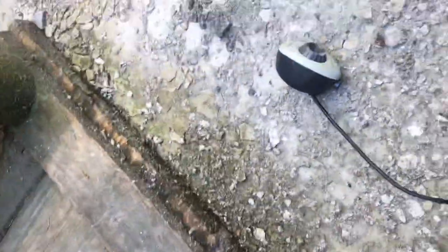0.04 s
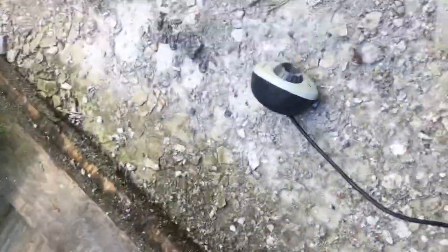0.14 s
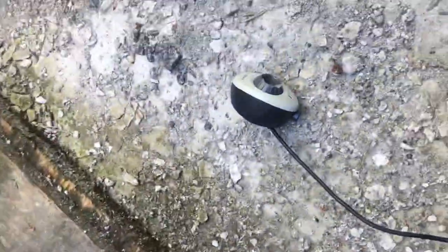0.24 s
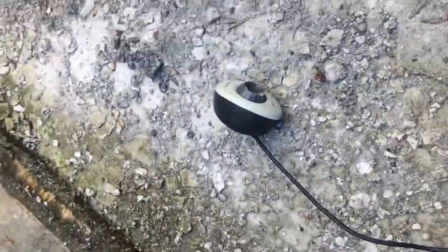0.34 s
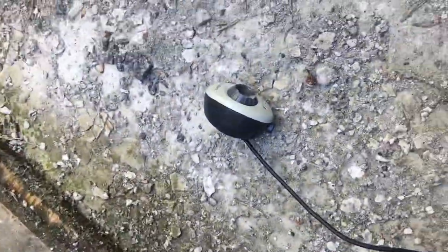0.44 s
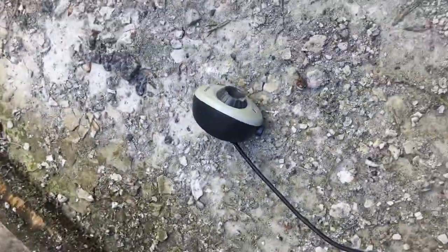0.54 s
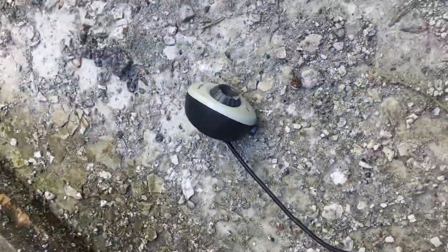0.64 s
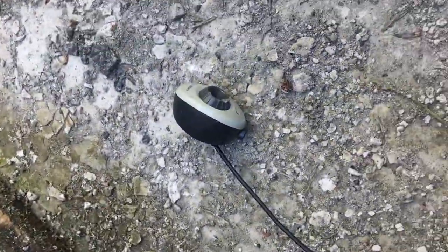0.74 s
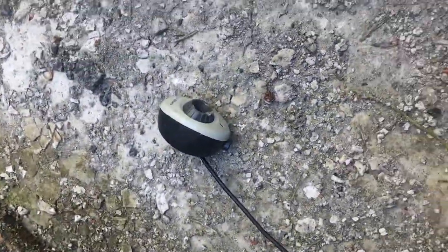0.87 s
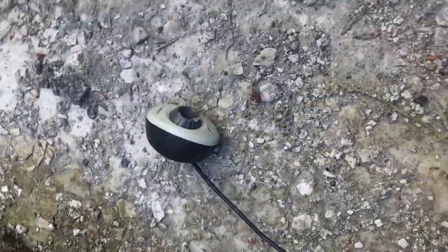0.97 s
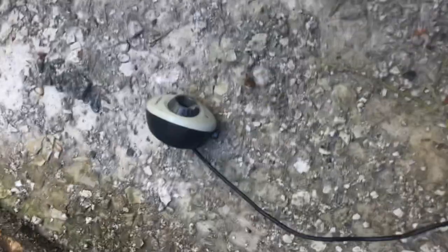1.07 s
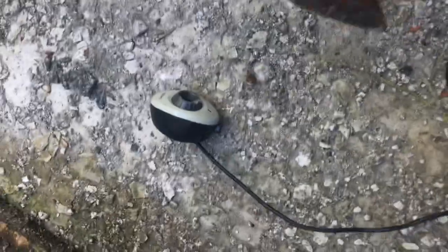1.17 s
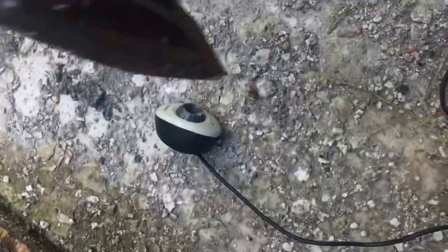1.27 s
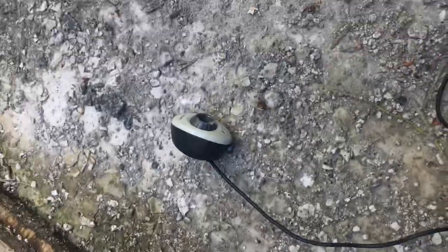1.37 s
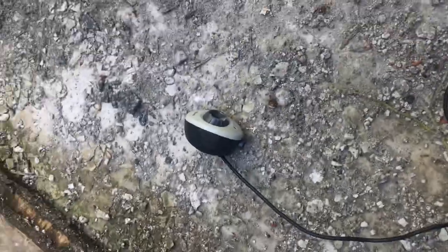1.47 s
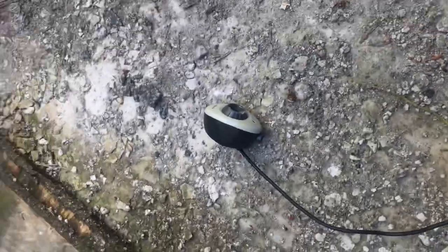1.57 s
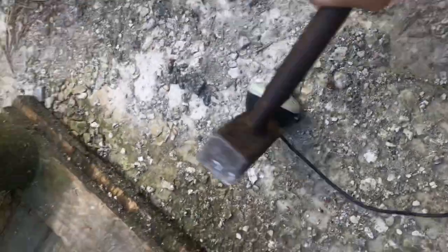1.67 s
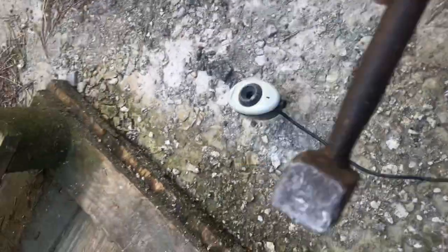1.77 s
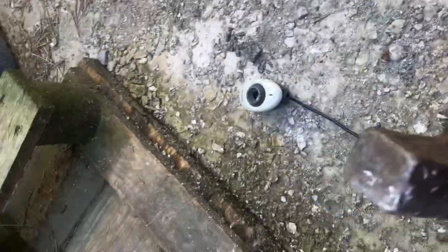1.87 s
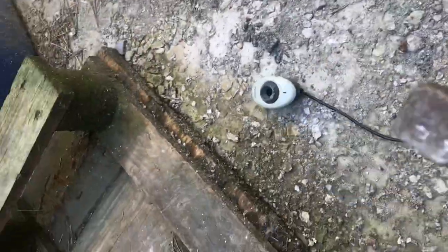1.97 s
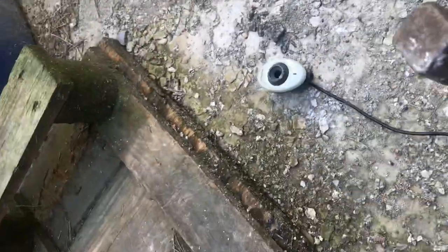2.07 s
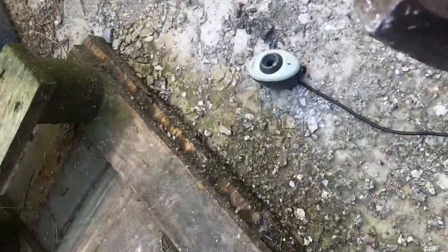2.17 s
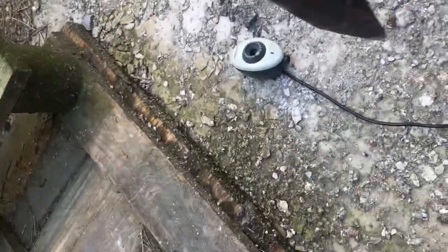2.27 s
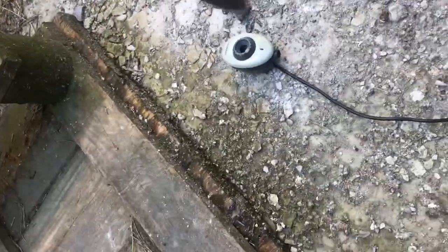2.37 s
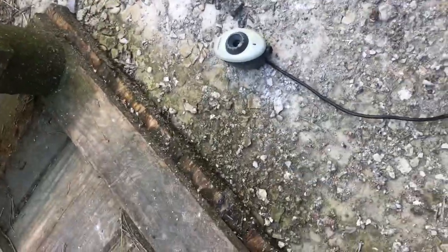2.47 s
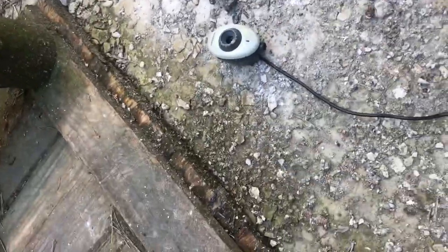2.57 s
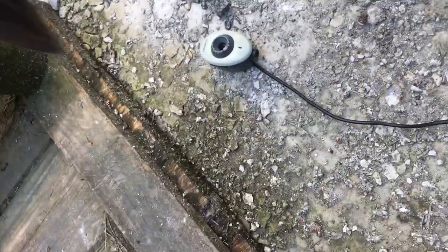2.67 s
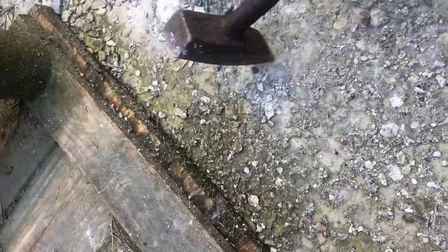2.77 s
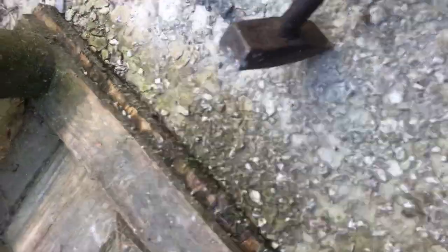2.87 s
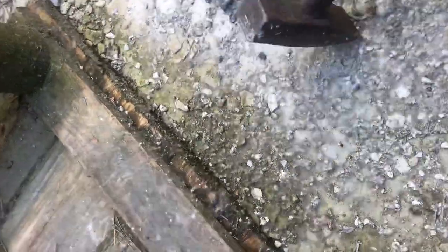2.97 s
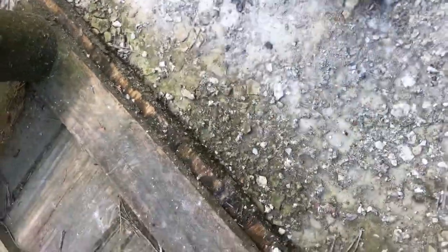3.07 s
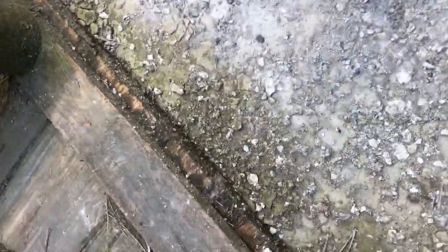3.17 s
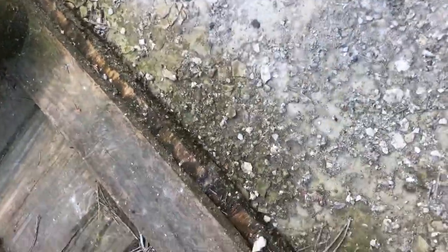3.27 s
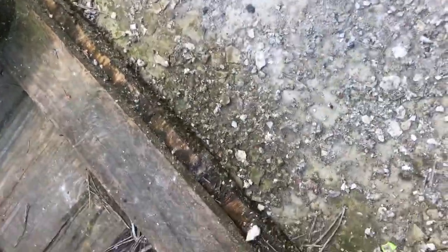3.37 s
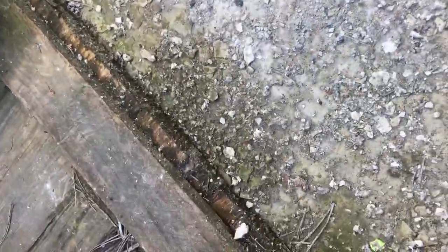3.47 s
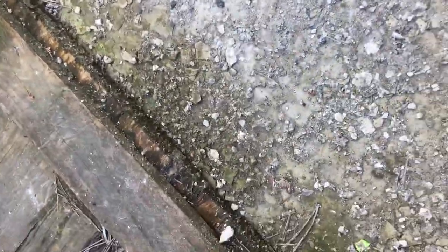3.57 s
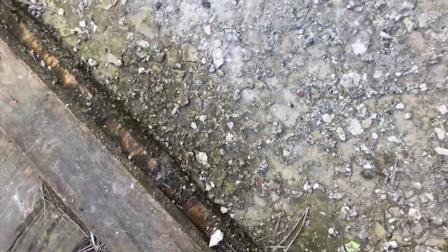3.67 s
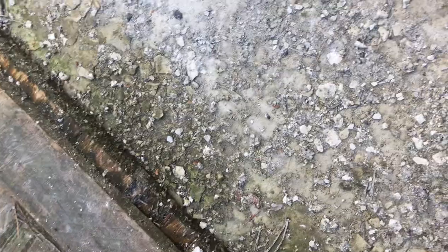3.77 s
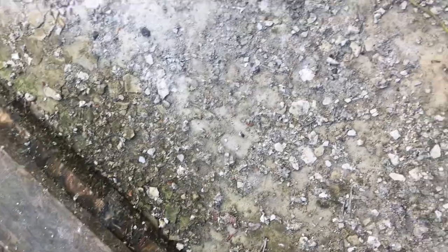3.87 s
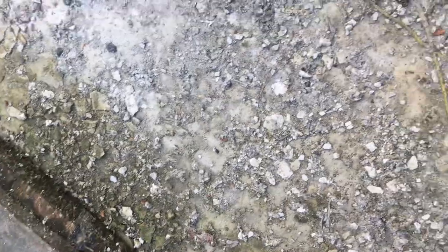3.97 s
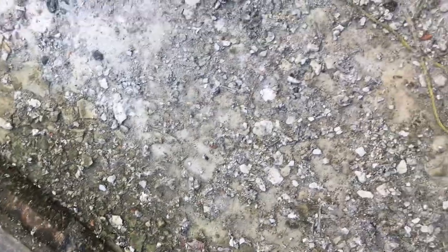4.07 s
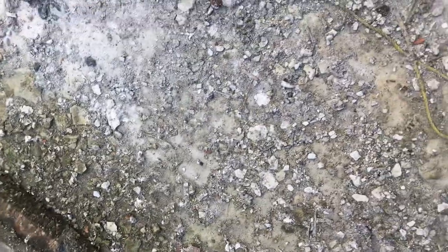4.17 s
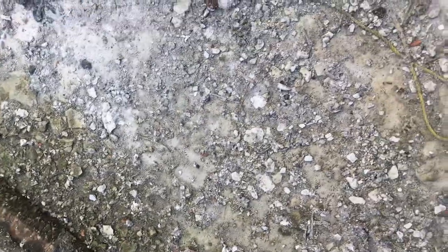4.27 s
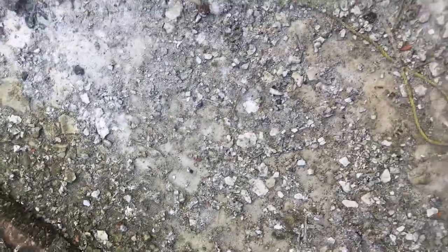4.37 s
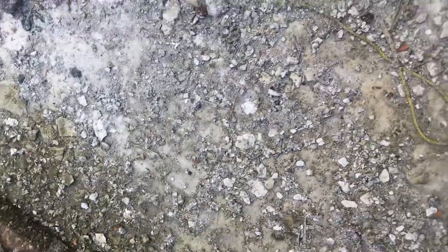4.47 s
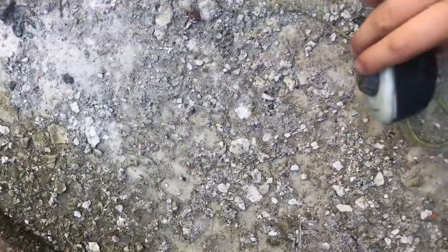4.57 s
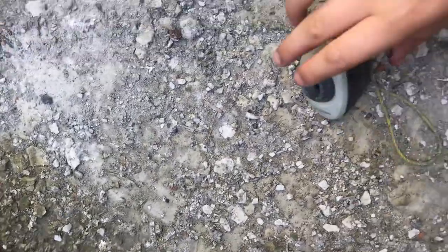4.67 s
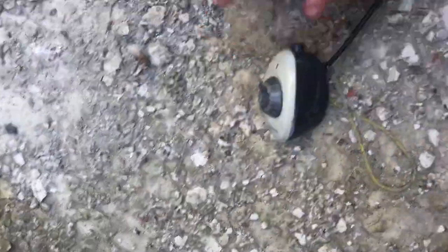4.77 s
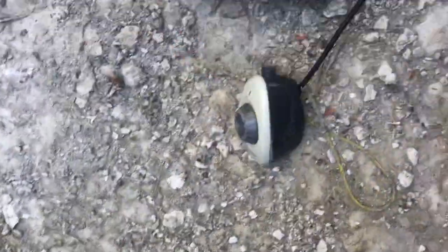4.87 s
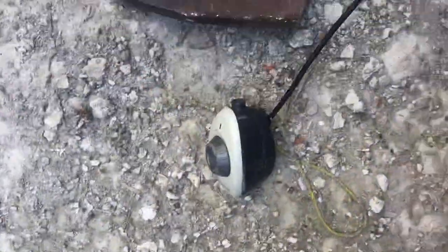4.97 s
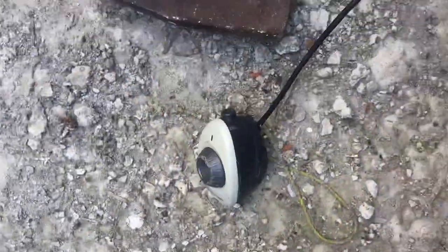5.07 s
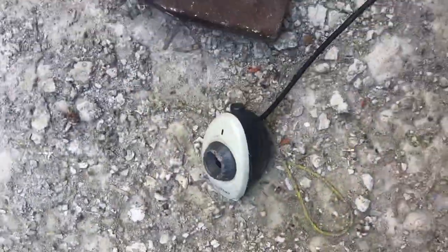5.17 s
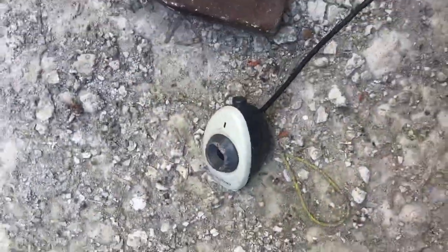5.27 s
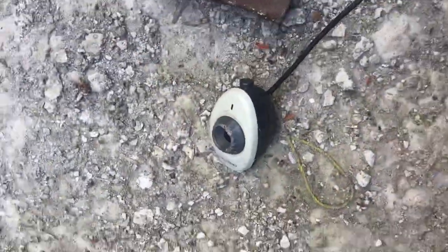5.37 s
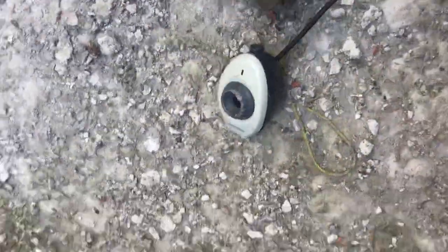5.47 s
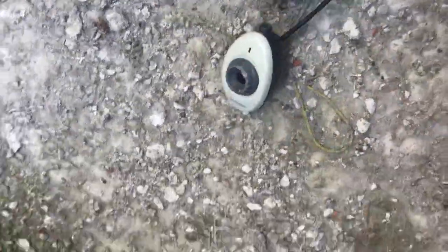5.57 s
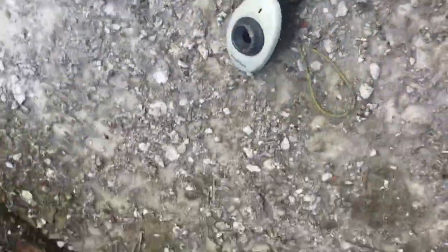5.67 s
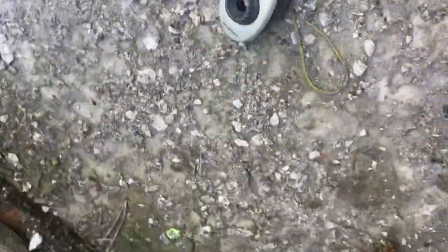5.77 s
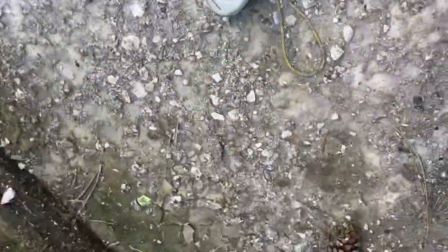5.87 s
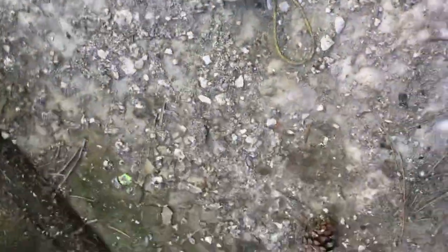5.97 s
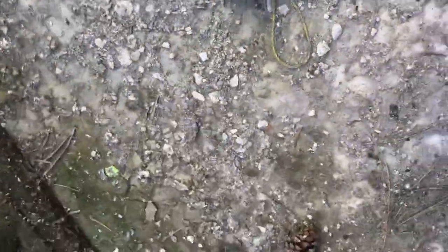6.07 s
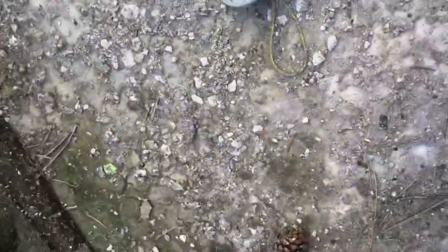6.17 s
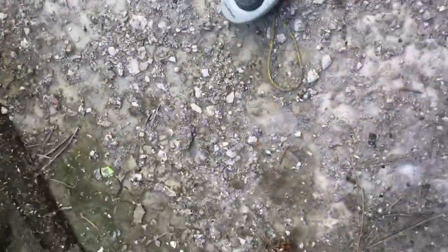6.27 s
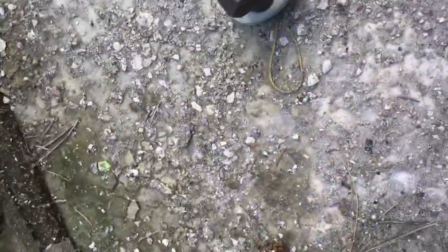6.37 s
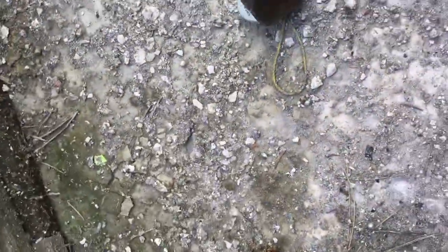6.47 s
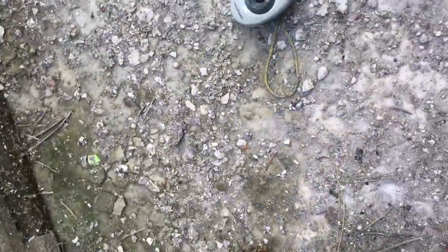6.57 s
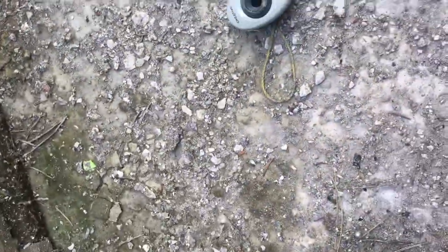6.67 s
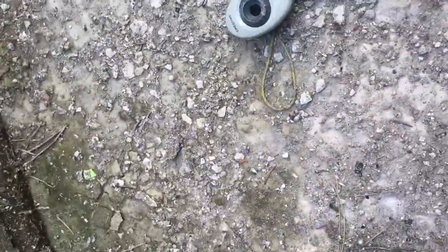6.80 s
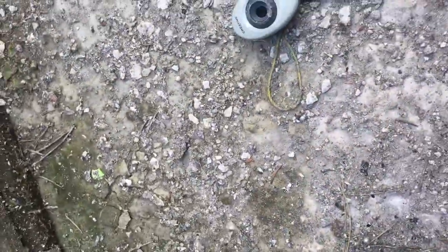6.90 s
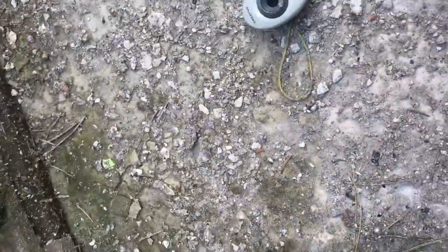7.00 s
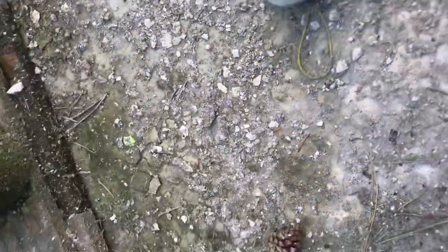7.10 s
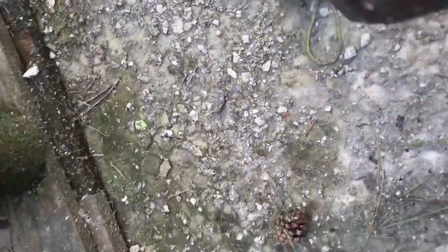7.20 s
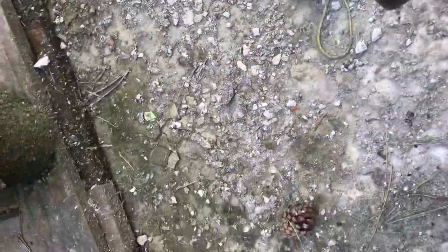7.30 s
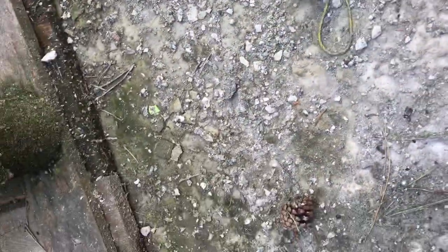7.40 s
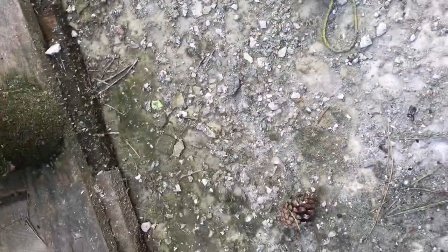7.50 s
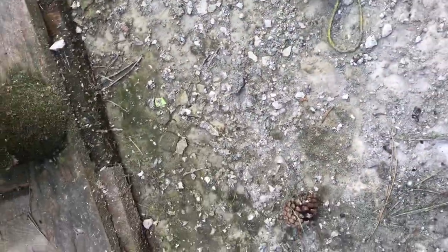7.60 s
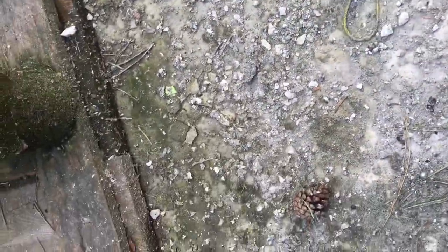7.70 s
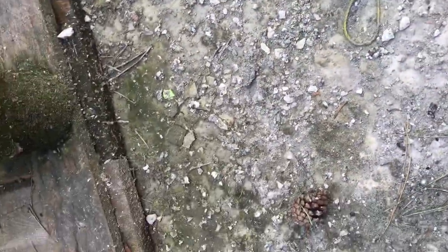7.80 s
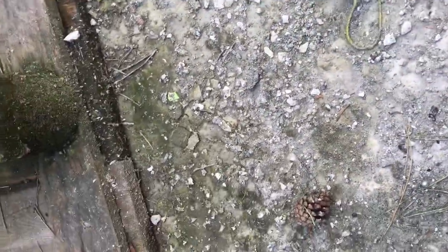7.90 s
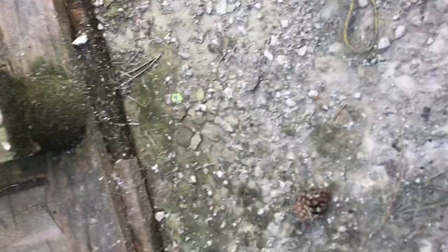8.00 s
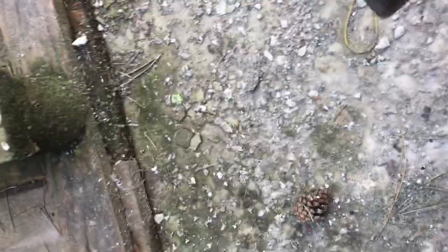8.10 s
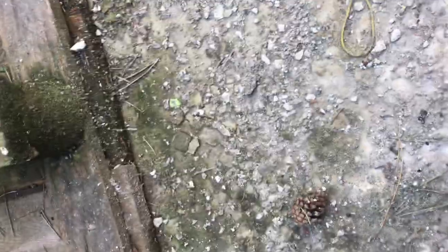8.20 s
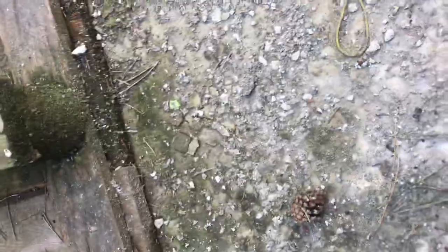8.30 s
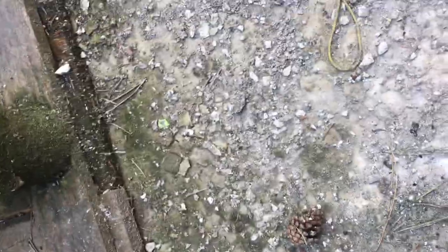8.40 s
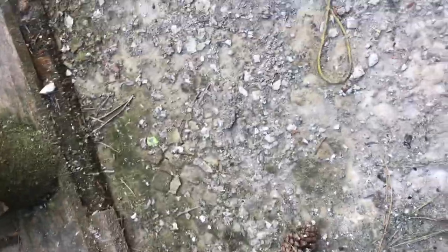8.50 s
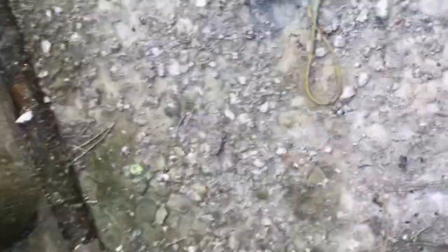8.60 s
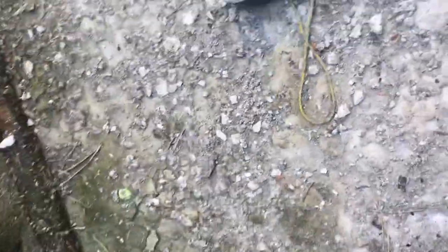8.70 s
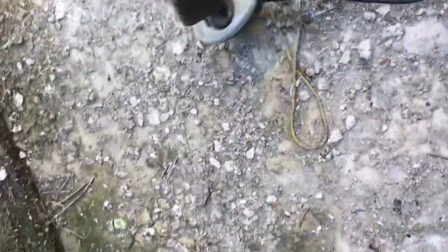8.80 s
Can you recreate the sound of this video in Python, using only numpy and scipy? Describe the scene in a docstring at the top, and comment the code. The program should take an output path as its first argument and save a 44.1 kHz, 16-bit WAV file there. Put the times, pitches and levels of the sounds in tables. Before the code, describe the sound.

A hammer cracks down six times on a small plastic camera on gravel, the casing knocking hollowly, over faint distant traffic.

```python
"""Distant traffic rumbles, grit ticks under moving feet and cable, and air puffs over the microphone.
At 1.7 s and 2.8 s a steel hammer cracks down on a small plastic camera lying on gravel. The casing
bounces and tumbles with hollow knocks, and the hammer head rings where it touches stone.
The traffic swells, and from 6.4 s four more blows land. The single microphone overloads on the blows."""
import sys
import numpy as np
from scipy import signal
from scipy.fft import rfft, irfft, next_fast_len
from scipy.io import wavfile
from scipy.ndimage import uniform_filter1d, map_coordinates

SR = 44100
rng = np.random.default_rng(int(sys.argv[2]) if len(sys.argv) > 2 else 0)


def int16_out(signal):
    """Quantize to a 16-bit WAV file."""
    q = np.round(np.clip(np.atleast_2d(signal).T, -1, 1) * 32767)
    wavfile.write(sys.argv[1], SR, q.astype(np.int16))


N = 390285

# Fader moves of the far road: (time [s], rumble [dB], tyre roar [dB])
ROAD_LEVELS = [(0.0, -43.5, -53.5), (1.18, -41.5, -55), (1.58, -38.5, -53.5), (2.44, -44, -52),
               (3.89, -38, -52), (4.04, -38, -51.5), (4.39, -40, -51), (5.1, -39, -49), (6.21, -33, -41.5),
               (7.05, -35, -44.5), (7.4, -35, -47), (8.55, -35, -47.5), (8.85, -33.5, -51.5)]
# Engine drones, one early, one rising, one fainter and falling: (time [s], pitch [Hz], level [dB])
EARLY_ENGINE = [(0, 75.9, -38.5), (.3, 79.94, -91), (.6, 84.7, -39), (1.1, 85.5, -58)]
RISING_ENGINE = [(3.9, 69.15, -55), (4.02, 71.24, -40.5), (4.88, 75.5, -44), (5.7, 81.47, -34.5),
                 (5.9, 82.17, -45), (6.41, 90, -38.5), (7.2, 89.7, -39), (8.7, 93.6, -32), (8.85, 86, -40)]
FALLING_ENGINE = [(5.4, 177.3, -54), (5.8, 181.8, -46), (6.7, 184, -46.5), (6.9, 160.9, -57.5),
                  (7.15, 148.5, -33.5), (7.35, 149.4, -51.5), (7.58, 150.4, -44.5), (8.1, 145, -47.5),
                  (8.85, 140, -46)]
# EQ curves of road rumble, tyre roar, buffeting air and grit: (frequency [Hz], level [dB])
RUMBLE_EQ = [(12, -43.5), (20, -3.5), (81, -1), (93, -3.5), (108, -8), (182, -17.5), (221, -19.5),
             (300, -21), (390, -46), (660, -120)]
ROAR_EQ = [(88, -32.5), (150, -5.5), (205, -10.5), (370, -9.5), (429, -16), (668, -10.5), (813, -18.5),
           (1040, -12.5), (1910, -19.5), (6640, -67), (7570, -68), (9840, -82), (16700, -120)]
AIR_EQ = [(12, -42.5), (20, 1), (65, -2.5), (167, -19), (316, -33), (471, -48), (600, -45), (780, -80),
          (1320, -120)]
GRIT_EQ = [(800, -32), (2000, -7.5), (3000, 9), (5000, 1), (7500, -5.5)]
# Air on the microphone: (time [s], hold [s], level [dB], rise [dB/s], fall [dB/s])
AIR_PUFFS = [(1.155, 0.049, -17.5, 202, 257), (2.25, 0.011, -42.5, 450.5, 140.5)]
# Bed of sliding grit: (time [s], level [dB])
GRIT_LEVELS = [(0.0, -59), (0.15, -69), (1.4, -68), (1.62, -69), (1.75, -70), (2.34, -63), (2.54, -69),
               (3.13, -69.5), (3.52, -60), (3.77, -64.5), (4.26, -72), (5.37, -63.5), (5.52, -59),
               (5.84, -60.5), (7.25, -70), (8.04, -59.5), (8.18, -60.5), (8.55, -69.5), (8.85, -67)]
# The clearest grit ticks: (time [s], level [dB], pitch [Hz])
GRIT_TICKS = [(0.0757, -43, 3060), (0.1007, -37.5, 3150), (0.1196, -32.5, 5600), (0.2142, -35, 4080),
              (0.231, -36, 5790), (0.2743, -45, 2470), (0.2897, -44, 2480), (0.4758, -42, 4070),
              (0.5566, -39, 3040), (0.843, -34.5, 4334), (0.9951, -44, 4880), (1.3493, -41, 3350),
              (1.3793, -55, 2420), (1.4262, -47, 3750), (1.4601, -38, 3800), (1.6212, -42, 3740),
              (1.8557, -40, 6030), (2.0857, -41, 5860), (2.1804, -44.5, 2560), (2.2308, -57, 2700),
              (2.2737, -43, 2820), (2.353, -52, 2950), (2.4645, -40, 2530), (2.5526, -37, 3780),
              (3.1294, -41, 2740), (3.7224, -39, 2890), (3.7723, -44, 6120), (4.1956, -33, 6500),
              (4.886, -36.5, 3420), (4.9107, -43.5, 2750), (5.3981, -42, 3720), (5.4735, -32, 4870),
              (5.4864, -32, 2900), (5.5817, -36, 2480), (5.6745, -37, 3040), (5.813, -31, 2920),
              (5.853, -34, 5860), (5.895, -28.5, 6360), (5.9693, -36, 2550), (6.0534, -32, 2910),
              (6.0836, -48, 3700), (6.105, -34.5, 4240), (6.1486, -28.5, 6060), (6.2148, -39, 2400),
              (8.2337, -46, 3010), (8.2877, -51, 3160)]
# Casing and cable drag over stones:
# (time [s], length [s], level [dB], hollow part [relative dB], bright part [relative dB], jerkiness [dB])
DRAGS = [(.08, 0.31, -59.5, -9, -2, 6.5), (2.102, 0.32, -69, -9, -3.5, 6.5),
         (0.554, 0.16, -52.5, -4, -10.5, 1.4), (0.99, .22, -60, -7.5, -9, 1.7),
         (1.48, 0.25, -64, 1.5, 1, 2), (2.921, 0.13, -45, -3, 0, 3.5), (3.05, 0.12, -51.5, 0.5, 3, 5.5),
         (3.836, 0.21, -56.5, -5, -2.5, 4.5), (4.177, 0.12, -46, 8.5, 1.5, 2.5),
         (5.032, 0.11, -59, -4.5, 0.1, 2.5), (5.321, 0.069, -58.5, -2.5, 1.4, 4),
         (5.384, 0.08, -50.5, -12.5, -4.5, 4.5), (5.45, 0.081, -50, -2.5, -3, 3.5),
         (5.595, 0.16, -60, -6, 0, 4.5), (5.768, .1, -54, -6, -1.5, 4), (5.927, 0.088, -55, -6, -3, 3),
         (8.2, .2, -60.5, -2.5, -7.5, 3)]
# Resonances of loose stones, hollow casing and bright cracks: (frequency [Hz], width [Hz], level [dB])
STONE_MODES = [(1600, 3500, 1), (3320, 2600, -3), (6000, 370, -16.5)]
CASING_MODES = [(660, 130, -8), (1077, 170, -1.5), (1560, 150, 2), (2110, 240, -1.5)]
CRACK_MODES = [(2550, 520, -2), (3660, 500, -2.5), (4010, 400, -1), (5850, 600, -2), (6740, 480, -2.5)]
# The casing or a stone lands:
# (time [s], click [dB], knock [dB], knock pitch [Hz], knock t60 [s], thud [dB], thud pitch [Hz])
LANDINGS = [(0.162, -23.5, -43, 1070, 0.032, -43, 299), (0.573, -51, -55, 1170, .035, -30.5, 538),
            (0.622, -52, -38, 1070, 0.064, -29.5, 610), (1.871, -29.5, -20, 1870, 0.061, -41, 253),
            (1.872, -40, -17.5, 1300, 0.065, -52, 250), (2.1294, -37.5, -30.5, 1245, 0.022, -46, 315),
            (2.235, -48, -48, 1200, .035, -26.5, 360), (2.287, -51, -39, 1215, .035, -32, 385),
            (2.7804, -25, -3.5, 1154, .035, -3, 660), (2.85, -24, 0.8, 1280, 0.026, -20, 690),
            (2.8723, -33, -2, 1040, 0.028, -12.5, 637), (2.9309, -6.5, 0, 1434, 0.066, -5.5, 676),
            (2.9369, -5.5, 4.5, 1346, .026, 1.5, 643), (2.9428, -47, -8, 1423, 0.035, -10, 680),
            (2.982, -11.5, -6, 1593, 0.044, -19, 641), (3.0004, -29, -12.5, 1540, 0.063, -26, 272),
            (3.096, -19.5, -25, 1510, 0.08, -24.5, 264), (3.113, -33.5, -24, 1640, 0.055, -27, 250),
            (3.161, -46, -32, 1550, .035, -48, 297), (3.411, -48, -21, 2050, 0.059, -14, 575),
            (3.8324, -30, -35.5, 2100, .023, -21.5, 310), (3.8421, -16, -25, 2020, .047, -20.5, 574),
            (3.9704, -29, -24, 2110, 0.037, -20.5, 703), (3.9834, -18, -24, 2110, .033, -29, 710),
            (4.2225, -24, -20.5, 1140, 0.07, -31, 685), (4.237, -16.5, -15.5, 1210, 0.036, -31, 690),
            (4.2467, -27.5, -10, 1580, 0.03, -22, 655), (4.69, -15, -13.5, 1240, 0.046, -17, 697),
            (5.4273, -31.5, -26, 4000, 0.041, -41, 259), (5.7434, -12, -5.5, 1395, 0.013, -20.5, 460),
            (5.7817, -13, -22.5, 1592, 0.053, -20.5, 454), (7.274, -39.5, -22, 1123, 0.037, -40.5, 250),
            (7.278, -43, -26.5, 1950, 0.044, -39, 272), (8.1738, -26.5, -22.5, 1606, 0.054, -33, 390)]
# Modes of the steel head ringing freely: (frequency [Hz], t60 [s])
HEAD_MODES = [(741, 1.1), (1034, .8), (2116, .33), (2482, .26), (4893, .22)]
# The head touches stone: (time [s], five mode levels [dB], ring time left by the grip [share])
HEAD_TOUCHES = [(0, -78, -72, -46, -35, -47, 0.19), (.162, -50.5, -51, -80, -80, -80, 0.52),
                (.28, -70, -78, -60, -52, -80, 0.65), (.31, -80, -74, -51, -51, -78, 0.71),
                (.54, -84, -86, -56, -52, -80, .56), (2.782, -14.5, -35, -27, -83, -73, 0.35),
                (3.411, -77, -75.5, -31, -78, -82, 0.22), (3.845, -41.5, -40, -36.5, -40, -40, 0.75),
                (3.915, -76.5, -77.5, -74, -37, -52, 1), (3.942, -78, -76, -75, -28, -57, 0.98),
                (3.971, -33, -45.5, -26, -26, -34.5, 1), (5.075, -75, -76, -52.5, -56, -58.5, .98),
                (5.34, -81, -80, -39.5, -40, -45, 0.35), (5.435, -79, -78, -49.5, -82, -52, .93),
                (5.49, -73, -80, -82, -79, -49, 0.67)]
# Low thumps through ground and hand: (time [s], level [dB], pitch [Hz], t60 [s])
GROUND_THUMPS = [(1.721, -24, 44.55, 0.19), (2.778, -20, 110, 0.09), (2.769, -28.5, 44.6, .12),
                 (3.048, -17, 43.7, 0.15), (6.374, -19.5, 42.8, 0.2), (7.161, -4.5, 41.5, .12),
                 (8.009, -20, 49.6, 0.087), (8.798, -16, 72, 0.091)]
# Hammer blows: (time [s], level [dB], casing [relative dB], casing note [Hz], crack resonance [Hz],
# its level [relative dB], thud [relative dB], crush time [s], scatter [relative dB],
# lingering note [Hz], head ring [dB])
HAMMER_BLOWS = [(1.7111, -2.5, 4, 1740, 5670, 7, -7.5, 0.0059, -28, 4160, -44),
                (2.7592, 0, 1, 2530, 4060, 1.5, -5.5, 0.0048, -24.5, 3960, -45.5),
                (6.3657, 1.5, -1.1, 1690, 3470, 13.5, -23.5, 0.0073, -26.5, 3940, -36),
                (7.158, 2, -3, 2360, 3430, 2, -26, 0.0036, -26.5, 3600, -34),
                (7.9984, -6, 5.5, 1500, 3640, 6.5, -14.5, 0.0099, -20.5, 3620, -42.5),
                (8.7914, -1, 0.7, 1480, 3490, 5, -10, 0.0051, -26, 3730, -49)]


def amp(db):
    """Gain of a level in dB."""
    return 10 ** (np.asarray(db) / 20)


def unit(x):
    """x at rms 1."""
    return x / np.sqrt(np.mean(x ** 2) + 1e-20)


def curves(rows, outside=None):
    """An automation curve for each column after the time."""
    times, *columns = np.transpose(rows)
    return [np.interp(np.arange(N) / SR, times, column, outside, outside) for column in columns]


def wobble(rate):
    """A smooth random curve, rate knots a second."""
    return map_coordinates(rng.standard_normal(int(N * rate / SR) + 4), [np.arange(N) * rate / SR])


def filtered(x, response):
    """x through a frequency response."""
    size = next_fast_len(len(x) + 2048)
    return irfft(rfft(x, size) * response(np.fft.rfftfreq(size, 1 / SR)), size)[:len(x)]


def colour(eq):
    """Response through EQ points on a log frequency axis."""
    points_hz, db = np.transpose(eq)
    return lambda hz: amp(np.interp(np.log(hz + 1), np.log(points_hz + 1), db, -120, -120))


def body(modes):
    """Response of a bank of resonators, alternating in polarity."""
    return lambda hz: sum((-1) ** k * amp(db) * 1j * hz * width / (centre**2 - hz**2 + 1j * hz * width)
                          for k, (centre, width, db) in enumerate(modes))


def rush(eq, patchy_db):
    """Coloured noise of rms 1 with patches of random gain."""
    spectra = signal.stft(rng.standard_normal(N + 512), nperseg=512)[2]
    patches = uniform_filter1d(rng.standard_normal(spectra.shape), size=6, axis=0)
    patches = unit(uniform_filter1d(patches, size=10, axis=1))
    noise = signal.istft(spectra * amp(patchy_db * patches), nperseg=512)[1][:N]
    return unit(filtered(noise, colour(eq)))


def add(track, s, sound):
    """Mix a sound into a track at s seconds."""
    part = track[round(s * SR):][:len(sound)]
    part += sound[:len(part)]


def burst(t, modes, hold, t60, spiky=.5, steep=1):
    """Tiny fractures drive resonances for hold seconds, then die away; steep sharpens the resonances."""
    force = rng.standard_normal(len(t)) * np.exp(spiky * rng.standard_normal(len(t)))
    envelope = amp(-60 * np.maximum(t - hold, 0) / t60) * (1 - np.exp(-t / .0003))
    response = lambda hz: body(modes)(hz) ** steep
    return filtered(force * envelope, response) / (2.83 * np.std(filtered(force, response)))


def engine(rows, waver):
    """A far engine's firing tone, slightly unsteady in pitch and strength."""
    hz = curves(rows)[0]
    level_db = curves(rows, outside=-120)[1]
    phase = 2 * np.pi * np.cumsum(hz * (1 + waver * wobble(12))) / SR
    fade = uniform_filter1d(amp(level_db), size=4000)
    return np.sqrt(2) * fade * amp(3.4 * wobble(7.2)) * np.sin(phase)


def traffic():
    """Rumble and tyre roar of a far road, with engines droning through it."""
    rumble_db, roar_db = curves(ROAD_LEVELS)
    rumble = amp(rumble_db + 1.8 * wobble(6)) * rush(RUMBLE_EQ, patchy_db=1.1)
    roar = amp(roar_db + .6 * wobble(5)) * rush(ROAR_EQ, patchy_db=.6)
    return (rumble + roar + engine(RISING_ENGINE, waver=.015)
            + engine(FALLING_ENGINE, waver=.018) + engine(EARLY_ENGINE, waver=.0059))


def air_puffs():
    """Air stirred by the swings buffets the microphone in lumps."""
    t = np.arange(N) / SR
    envelope = sum(amp(db - np.maximum(0, np.maximum(rise * (s - t), fall * (t - s - hold))))
                   for s, hold, db, rise, fall in AIR_PUFFS)
    buffet = unit(amp(1.5 * wobble(60)) * rush(AIR_EQ, patchy_db=.3))
    return buffet * uniform_filter1d(envelope, size=900)


def drags():
    """Casing and cable catch on stone after stone: a jerky rasp with hollow and bright layers."""
    track = np.zeros(N)
    jerk = unit(wobble(130))
    coarse, fine = rng.standard_normal((2, N))
    rasp = unit(filtered(coarse, lambda hz: body(STONE_MODES[1:2])(hz) ** 2))
    rasp += .17 * unit(filtered(coarse, body(CRACK_MODES)))
    bright = unit(filtered(fine, body(STONE_MODES[2:])))
    hollow = unit(filtered(coarse, body(CASING_MODES)))
    for s, length, db, hollow_db, bright_db, jerky_db in DRAGS:
        times = s + length * np.array([0, .31, .62, 1])  # fade in, hold, fade out
        stroke_db, = curves(np.transpose([times, [db - 15, db, db, db - 15]]), outside=-120)
        envelope = uniform_filter1d(amp(stroke_db), size=500) * unit(amp(jerky_db * jerk))
        track += envelope * (rasp + amp(hollow_db) * hollow + amp(bright_db) * bright)
    return track


def gravel():
    """A faint bed of sliding grains, with rasping drags and single grit ticks on top."""
    bed_gain = amp(curves(GRIT_LEVELS)[0])
    impulses = amp(2 * rng.exponential(size=N)) * rng.standard_normal(N) * (rng.random(N) < .05)
    grains = unit(filtered(impulses, colour(GRIT_EQ)))
    track = bed_gain * (.4 * grains + .85 * rush(GRIT_EQ, patchy_db=.7)) + drags()
    faint_ticks = []  # scattered at random, riding the bed's level
    for when, strength, pitch in rng.random((140, 3)):
        at = when * (N - 1)
        bed_db = 20 * np.log10(bed_gain[int(at)])
        faint_ticks.append((at / SR, bed_db + 12 + 8 * strength, 2600 + 3600 * pitch))
    t = np.arange(round(.033 * SR)) / SR
    for s, db, hz in list(GRIT_TICKS) + faint_ticks:
        second_mode = (3300, 1800, -3) if hz > 4700 else (6500, 1800, -7)
        modes = sorted([(hz, .6 * hz, 0), second_mode])
        add(track, s, amp(db) * burst(t, modes, hold=.0012, t60=.013, spiky=.3, steep=2.5))
    return track


def landings(pitched_share=.55):
    """Casing or stone lands: a bright click, a hollow knock, part note and part rattle, a dull thud."""
    track, t = np.zeros(N), np.arange(round(.1 * SR)) / SR
    for s, click_db, knock_db, hz, t60, thud_db, thud_hz in LANDINGS:
        note = np.sin(2 * np.pi * hz * t) * amp(-60 * t / t60) * (1 - np.exp(-t / .0007))
        rattle_modes = [(hz, .55 * hz, 0), (1.1 * hz, .8 * hz, -6)]
        rattle = burst(t, rattle_modes, hold=.0014, t60=.54 * t60, steep=1.48)
        knock = pitched_share * note + (1 - pitched_share) * 2 * rattle
        thud = burst(t, [(thud_hz, .23 * thud_hz, 0)], hold=.003, t60=.02, steep=1.2)
        click = burst(t, CRACK_MODES, hold=.00062, t60=.028)
        add(track, s, amp(click_db) * click + amp(knock_db) * knock + amp(thud_db) * thud)
    return track


def head_ring(blow_lag_s=.006, blow_share=.77, twin_hz=4958):
    """The steel head rings: each touch on stone has its own mix of modes, a blow only the lowest."""
    track, t = np.zeros(N), np.arange(round(.9 * SR)) / SR
    partials = [(s + blow_lag_s, *HEAD_MODES[0], db, blow_share) for s, *_, db in HAMMER_BLOWS]
    for s, *levels_db, share in HEAD_TOUCHES:
        partials += [(s, hz, t60, db, share) for (hz, t60), db in zip(HEAD_MODES, levels_db)]
        # a close twin beats against the top mode
        partials.append((s, twin_hz, HEAD_MODES[-1][1], levels_db[-1] - 9, share))
    for s, hz, t60, db, share in partials:
        tone = np.sin(2 * np.pi * (hz * t + rng.random())) * (1 - np.exp(-t / .003))
        add(track, s, amp(db - 60 * t / (t60 * share)) * tone)
    return track * amp(2 * wobble(45))  # the head chatters on grit as it rings


def hammer_blows():
    """The casing crushes for some milliseconds and sounds its note, grit scatters, the ground thumps."""
    track, t = np.zeros(N), np.arange(round(.3 * SR)) / SR
    for (s, db, casing_db, note_hz, crack_hz, crack_db, thud_db,
         crush_s, scatter_db, linger_hz, _) in HAMMER_BLOWS:
        casing = burst(t, CASING_MODES + [(note_hz, 200, 0)], crush_s, t60=.053)
        thud = burst(t, [(322, 330, 0)], crush_s, t60=.14)
        scatter_modes = sorted(STONE_MODES + [(linger_hz, 290, 2.7), (note_hz, 150, .4)])
        scatter = burst(t, scatter_modes, hold=.025, t60=.3, spiky=.27)
        crack = burst(t, sorted(CRACK_MODES + [(crack_hz, 600, crack_db)]), crush_s, t60=.045)
        hit = crack + amp(casing_db) * casing + amp(thud_db) * thud + amp(scatter_db) * scatter
        add(track, s, amp(db) * hit)
    soft_attack = (1 - np.exp(-t / .004)) ** 2  # the ground yields slowly
    for s, db, hz, t60 in GROUND_THUMPS:
        add(track, s, -2 * np.sin(2 * np.pi * hz * t) * amp(db - 60 * t / t60) * soft_attack)
    return track


def scene():
    """The mono mix of all layers, on both channels."""
    mono = hammer_blows() + landings() + gravel() + head_ring() + traffic() + air_puffs()
    return np.array([mono, mono])


def record(dry):
    """Gain control ducks after an overload and lets go quickly; the input clips and loses its top end."""
    x = dry[0]
    hold_s, attack_s, duck_db = .19, .08, -7
    mic_hz, top_hz = 7550, 15700
    overloads = np.cumsum(np.abs(x) > .8)
    held = overloads > np.pad(overloads, (round(hold_s * SR), 0))[:N]
    pace = 1 / (attack_s * SR)
    depth = signal.lfilter([pace], [1, pace - 1], held) * uniform_filter1d(held * 1., size=600)
    x = x * amp(duck_db * depth)
    x = x / (1 + np.abs(x / .92) ** 4) ** (1 / 4)  # soft clip
    x = filtered(x, lambda hz: 1 / np.sqrt(1 + (hz / mic_hz) ** 120))  # steep high cut
    x = np.clip(amp(.6) * x, -.99, .99)
    x = filtered(x, lambda hz: hz < top_hz)
    return np.array([x, x])


dry = scene()
out = record(dry)
int16_out(out)
```